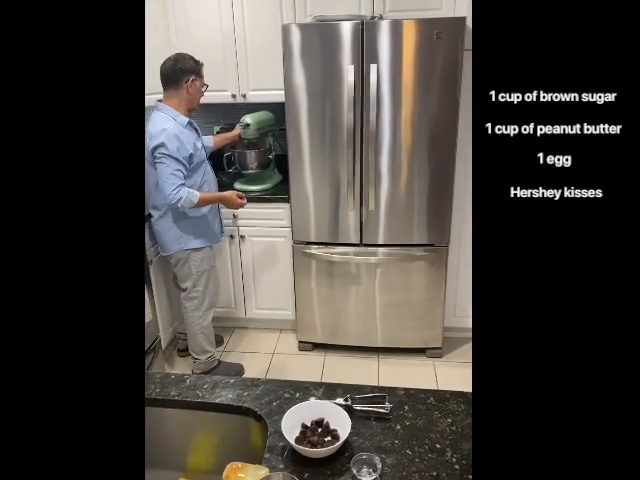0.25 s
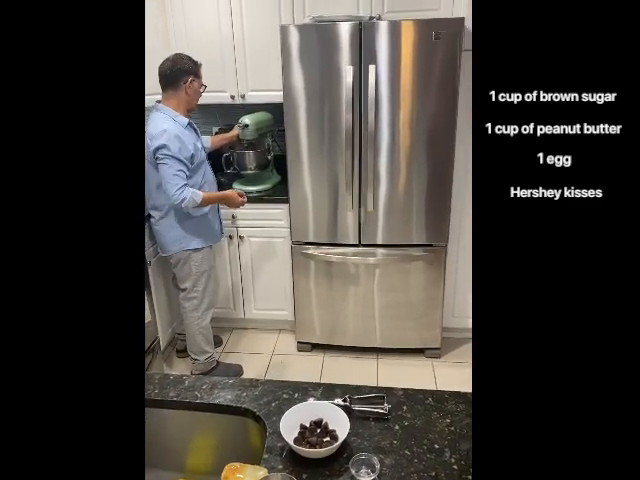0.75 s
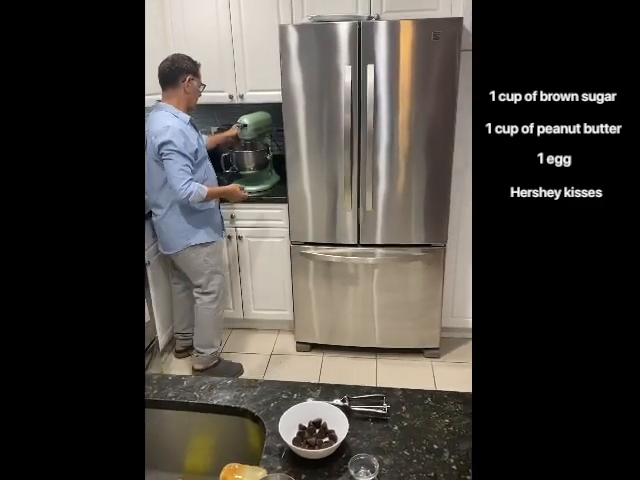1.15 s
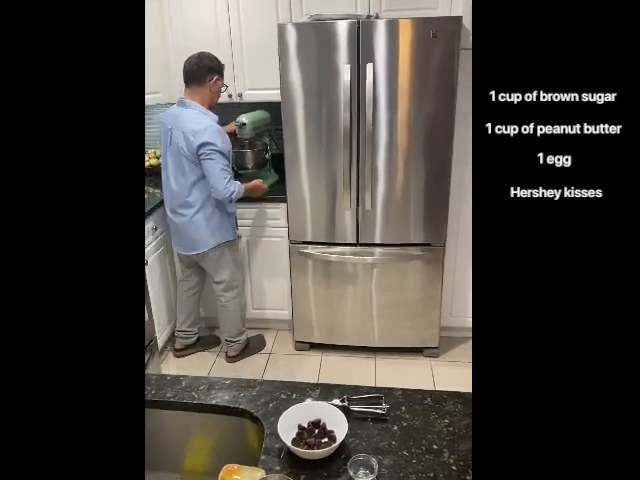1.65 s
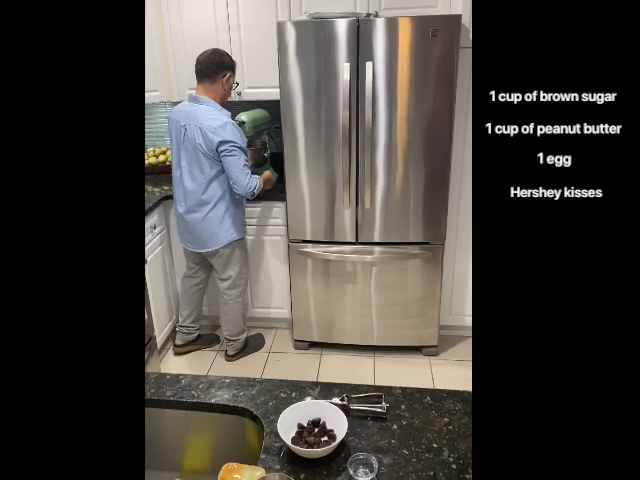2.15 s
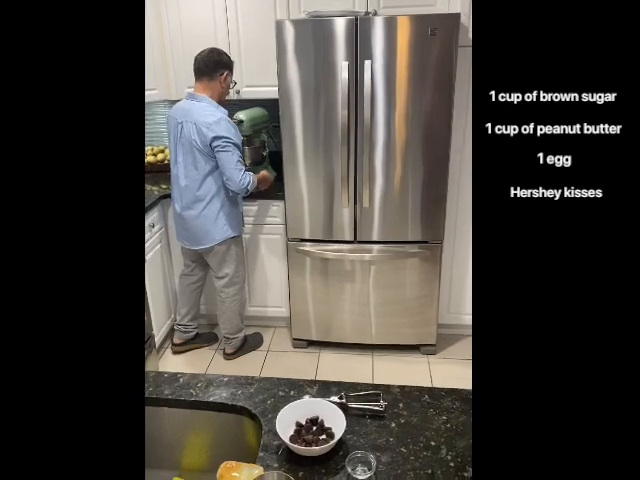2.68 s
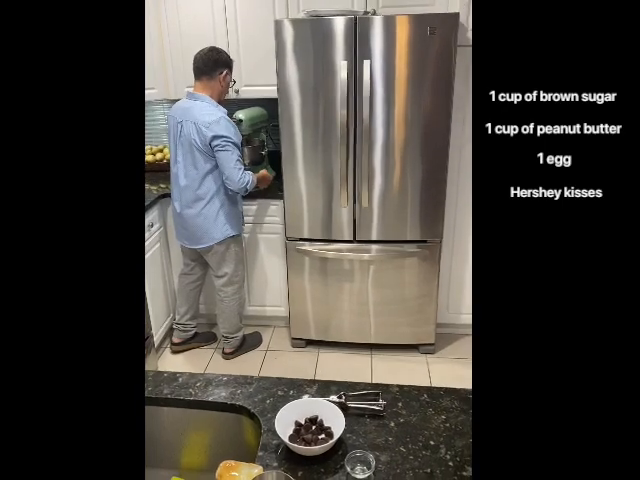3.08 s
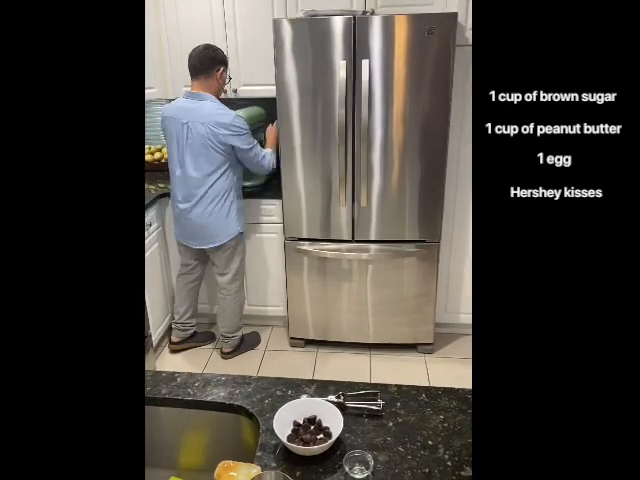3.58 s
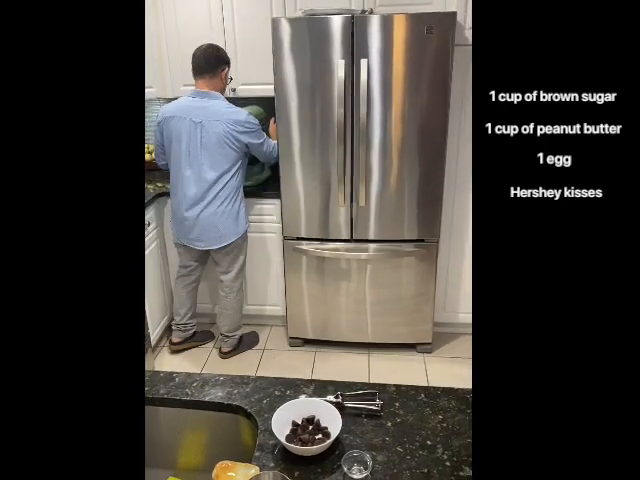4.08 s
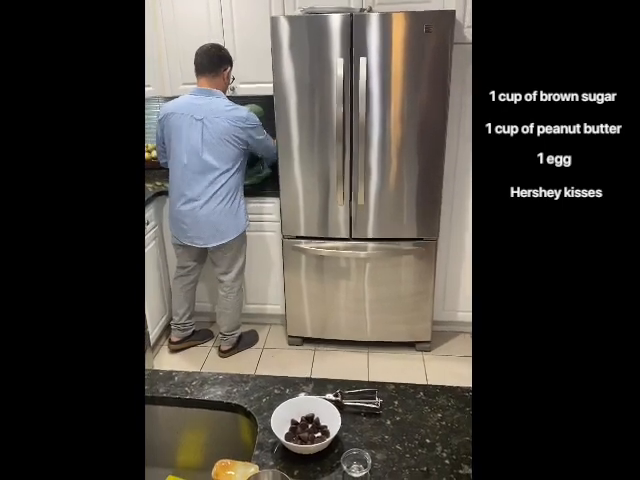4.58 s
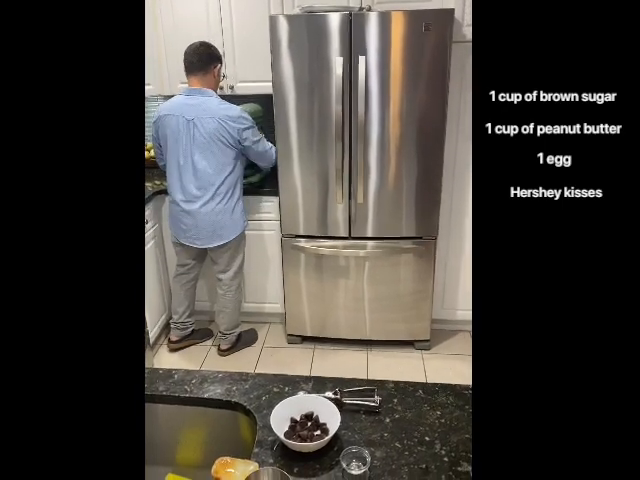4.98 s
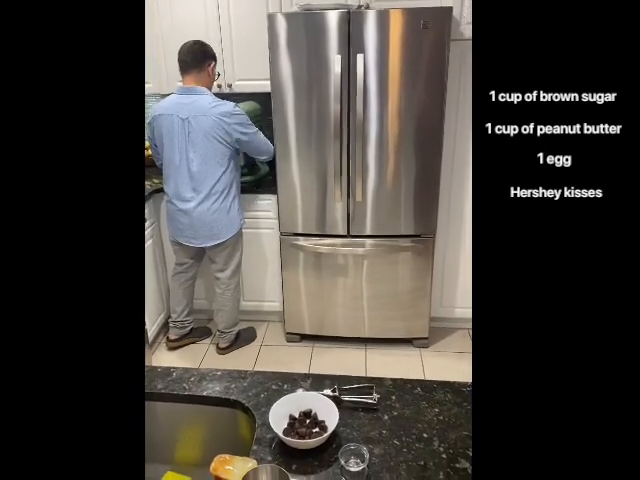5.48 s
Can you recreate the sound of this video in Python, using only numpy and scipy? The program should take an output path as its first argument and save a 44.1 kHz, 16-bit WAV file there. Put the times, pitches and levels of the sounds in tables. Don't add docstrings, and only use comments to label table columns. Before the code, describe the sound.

High lurching gear whine of a kitchen mixer, a sharp switch snap, falling spin-down hum, then steel bowl knocks and short drags.

```python
import sys
import numpy as np
from scipy import signal
from scipy.fft import rfft, irfft, next_fast_len
from scipy.io import wavfile
from scipy.ndimage import map_coordinates

SR = 44100
rng = np.random.default_rng(int(sys.argv[2]) if len(sys.argv) > 2 else 0)


def waveform_to_disk(signal):
    frames = np.transpose(np.atleast_2d(signal))
    scaled = np.clip(frames, -1, 1) * 32767
    samples = np.round(scaled).astype(np.int16)
    wavfile.write(sys.argv[1], SR, samples)


def rack_gain(trim_db):
    fader = np.asarray(trim_db, float)
    return 10 ** (fader / 20)


N = 252693
TIME = np.arange(N) / SR
HALF = np.array([[.5], [-.5]])

TEETH, FULL_HZ = 20, 2376
START_SAG_HZ, SETTLE_S = 12, .7
OFF_S, STALL_S = 3.222, 4.055


def unit(x):
    return x / np.sqrt(np.mean(x ** 2) + 1e-20)


def along(points, hz):
    f, v = np.transpose(points)
    return np.interp(np.log(hz + 1), np.log(f + 1), v)


def curves(rows):
    s, *cols = np.transpose(rows)
    return [np.interp(TIME, s, c) for c in cols]


def wobble(rate):
    knots = rng.standard_normal(int(N * rate / SR) + 4)
    return map_coordinates(knots, [TIME * rate])


def filtered(x, response):
    m = next_fast_len(N + SR // 2)
    return irfft(rfft(x, m) * response(np.fft.rfftfreq(m, 1 / SR)), m)[..., :N]


def noise(gain):
    return unit(filtered(rng.standard_normal((2, N)), gain))


def coloured(points):
    return noise(lambda hz: rack_gain(along(points, hz)))


def resonance(modes, hz):
    peaks = sum(rack_gain(2 * db) / (1 + (2 * (hz - c) / w) ** 2) for c, w, db in modes)
    return np.sqrt(1 + peaks)


def speed_db():
    coast_s, friction_hz = .85, 1000
    coasting = np.exp(-np.clip(TIME - OFF_S, 0, None) / coast_s)
    left = (FULL_HZ + friction_hz) * coasting - friction_hz
    return 20 * np.log10(np.clip(left / FULL_HZ, 1e-3, 1))


def stall_db():
    drop_db, fade_db_per_s = 7.5, 94
    late = np.clip(TIME - STALL_S, 0, None)
    return -drop_db * np.clip(late / 0.03, 0, 1) - fade_db_per_s * late


# t/s, level/dB, left-right/dB
WHINE_PATH = [(0.0, -36.5, 7), (0.03, -27, -0.5), (1.47, -27, 2), (1.68, -34, -2), (1.74, -32, 1),
              (2.12, -32, -2), (2.16, -42.5, 20), (2.19, -37, -2), (2.26, -30.5, -4), (2.41, -39.5, -5.5),
              (2.48, -41.5, -15), (2.54, -28, 0), (2.69, -37, -10.5), (2.84, -28.5, 2), (2.92, -43.5, -10),
              (3.04, -30, 0.5), (3.17, -39, -8), (3.22, -35.5, -6.5)]
# t/s, level/dB, speed change/%
DOUGH_LURCHES = [(.004, -2, -1.4), (.06, 1, 0.18), (.098, 2.5, -1.1), (0.118, -12, -0.37),
                 (.165, 3.5, 0.0013), (.191, -4, -0.27), (.224, -3, .1), (.262, 2.5, -0.27),
                 (.305, -1.5, 0.24), (.331, -1.5, 0.023), (.356, 2.5, 0.042), (.387, -4, 0.13),
                 (.412, 3, -0.16), (.437, -0.5, 0), (0.484, -8, 0.17), (.502, 2.5, 0.26),
                 (0.529, -12.5, 1.32), (.57, -4.5, -0.01), (.605, 3.5, -0.035), (0.649, -7, -1.47),
                 (.675, 3.5, 0.04), (0.693, -8.5, 1.02), (.725, -3.5, 0.2), (.78, 2.5, -0.11),
                 (.85, -1.5, 0.12), (.9, -4, -0.45), (.958, 3.5, 0.057), (1.0, -4, 0.0051),
                 (1.029, -7, 1.39), (1.125, 4, -0.021), (1.145, -5, 0.067), (1.24, -3, -0.041),
                 (1.28, 4, 0.1), (1.32, 3, -0.044), (1.47, 1.5, 0), (1.495, -3, .1), (1.545, -2, -0.14),
                 (1.599, -9.5, -0.61), (1.66, -16, 0.051), (1.72, 3, -0.021), (1.745, -4, 0.024),
                 (1.78, 4, 0.03), (1.8, -7.5, -0.036), (1.85, -14, -0.013), (1.92, -14, 0.47),
                 (2.061, -11, 0.64), (2.101, -10, -0.63), (2.18, -2, 0.14), (2.3, 0, 0.018),
                 (2.326, 6, 0.11), (2.359, -7, -0.14), (2.589, -3, -0.11), (2.64, 4.5, 0),
                 (2.74, 0.5, 0.048), (2.79, 1, 0.05), (2.87, -1, -0.062), (2.98, 3.5, 0.046),
                 (3.0, -5.5, 0.038), (3.09, -3, 0.39)]
# f/Hz, width/Hz, level/dB
GLIDE_CROSSINGS = [(2180, 170, 5), (1420, 90, 9), (1150, 100, 7)]


def mesh():
    lurch_s = 0.0083
    db, pan_db = curves(WHINE_PATH)
    s, dip_db, percent = np.transpose(DOUGH_LURCHES)[:, :, None]
    near = np.exp(-.5 * ((TIME - s) / lurch_s) ** 2)
    on = np.clip((OFF_S - TIME) / .03 + 1, 0, 1)
    speed = rack_gain(speed_db()) + np.sum(near * percent, axis=0) / 100
    hz = FULL_HZ * speed - START_SAG_HZ * np.exp(-TIME / SETTLE_S)
    rocking = 4 * wobble(30) * on
    step_in_s, step_s = 2.24, 0.33
    lead = np.interp(TIME, [step_in_s, step_in_s + step_s], [1.89, 1.1])
    crossing = sum(lift_db / (1 + ((hz - c) / w) ** 4) for c, w, lift_db in GLIDE_CROSSINGS)
    glide_db = -52 + speed_db() + crossing
    powered_db = db + np.sum(near * dip_db, axis=0)
    return hz + rocking, on * powered_db + (1 - on) * glide_db, on * pan_db, lead


# t/s, level/dB
MESH_OVERTONE = [(0, -50), (.35, -39), (1.2, -48), (1.8, -45), (1.95, -35.5), (2.2, -40), (2.5, -35),
                 (2.72, -41.5), (2.8, -37), (3.2, -43)]
# multiple of tooth pitch, level/dB
GLIDE_PARTIALS = [(1.5, -52), (2, -50)]
# shaft order, level/dB
SHAFT_ORDERS = [(2.575, -54), (3.03, -56), (3.54, -61.5), (4, -58.5), (9, -53), (10.16, -51), (10.37, -51),
                (12, -50.5), (13, -57.5), (18, -68.5), (24, -74), (25.16, -49), (27.7, -72), (29, -53),
                (36, -50.5), (42, -46), (46, -49), (47, -56), (48.1, -50), (50.1, -43.5), (51.1, -46.5),
                (56, -52.5), (60, -49)]


def gear():
    hz, db, pan_db, lead = mesh()
    off = np.clip(TIME - OFF_S, 0, None)
    loose = np.clip(off / .05, 0, 1)
    turns = 2 * np.pi * np.cumsum(hz + 3 * wobble(25.1)) / SR
    steady_hz = FULL_HZ - START_SAG_HZ * np.exp(-TIME / SETTLE_S) + 3 * wobble(4)
    steady = 2 * np.pi * np.cumsum(steady_hz) / SR
    wheel_hz, high_point_s, runout_db = 19.8, 2.038, 2
    runout = runout_db * np.cos(2 * np.pi * wheel_hz * (TIME - high_point_s) + .5 * wobble(3))

    chatter = 1.6 * loose * wobble(80)
    flutter_db = (.7 + 2.5 * loose) * wobble(45) + loose * runout
    flutter_db = flutter_db + np.array([wobble(22), wobble(22)])
    tone = rack_gain(db + 6.5 + HALF * pan_db + flutter_db) * np.sin(turns + chatter + HALF * lead)
    wall_level = rack_gain(-37 - 80 * off + 3 * wobble(25)) * (off > 0)
    lingering = wall_level * np.sin(2 * np.pi * 2372 * TIME + HALF * 1.2)

    def slip(k):
        return np.array([[0], [k]]) + (.4 + .018 * k) * wobble(20 + 1.5 * k)

    def beads():
        return 2.5 * wobble(22) + wobble(3)

    orders = 0
    for k, level in SHAFT_ORDERS:
        order_db = level + 3.0 + runout * np.clip(k / 40, .6, 1) + beads()
        orders = orders + rack_gain(order_db) * np.sin(k * steady / TEETH + slip(k))
    overtone_db = curves(MESH_OVERTONE)[0] + 1.6 * runout + 3.5 * wobble(12)
    orders = orders + rack_gain(overtone_db) * np.sin(2.005 * steady + [[0], [1]] + .7 * wobble(40))
    rattling = loose * sum(rack_gain(level + speed_db() + beads()) * np.sin(k * (turns + chatter))
                           for k, level in GLIDE_PARTIALS)
    return tone + lingering + rattling, orders * rack_gain(-250 * off)


# f/Hz, level/dB per Hz
BRUSH_HISS = [(1200, -63), (2000, -20.5), (2700, -12), (3700, -18), (4700, -10.5), (5900, -15.5),
              (8000, -19), (10000, -19), (12500, -23), (15200, -25.5), (17000, -28.5)]
# f/Hz, level/dB per Hz
BEARING_GROWL = [(90, -77), (150, -20), (200, -20), (300, -15.5), (650, -23.5), (1200, -12.5),
                 (1700, -17.5), (2300, -17.5), (3500, -49)]
# f/Hz, width/Hz, level/dB over the noise
HOUSING_MODES = [(411.7, 13, 10), (436, 13, 9), (658.4, 29, 20), (851, 30.6, 14), (1197, 70, 4.5),
                 (3290, 28, 5), (5460, 190, -2), (5960, 43, 4.5)]


def motor():
    still = 0.096
    air = np.clip(rack_gain(speed_db()) - still, .04, 1) / (1 - still)
    hiss_db = -35.5 + 0.86 * 20 * np.log10(air) + stall_db()
    growl_db = -40.5 + 0.72 * speed_db() + stall_db()

    def housed(colour):
        return noise(lambda hz: rack_gain(along(colour, hz)) * resonance(HOUSING_MODES, hz))

    load = wobble(5.9)
    hiss = rack_gain(hiss_db + 4.5 + .5 * load + 0.93 * wobble(29.48)) * housed(BRUSH_HISS)
    growl = rack_gain(growl_db + 0.5 + 0.24 * load + 0.25 * wobble(26)) * housed(BEARING_GROWL)
    dulled = rack_gain(0.12 * speed_db()) - 1
    upper = filtered(growl, lambda hz: 1 / (1 + (1000 / (hz + 1)) ** 4))
    return hiss + growl + dulled * upper


# f/Hz, width/Hz, level/dB, rubbed level/dB under it
SINGING_MODES = [(393, 26, -49, -12), (650, 47, -36.5, -15), (850, 51, -42, -32), (1450, 190, -47, -24)]
# shaft order, level/dB
SWEEPING_ORDERS = [(5.3, 0), (9.5, 2), (11, 3.5), (20, 2), (30, -8)]


def humming():
    shaft_hz = FULL_HZ * rack_gain(speed_db()) / TEETH
    free = np.clip((TIME - OFF_S) / 0.23, 0, 1) * rack_gain(2 * stall_db())
    hum = 0
    for c, w, db, rub_db in SINGING_MODES:
        swept = sum(rack_gain(level) / (1 + (2 * (k * shaft_hz - c) / w) ** 2) for k, level in SWEEPING_ORDERS)
        phase = 2 * np.pi * c * TIME + np.array([wobble(30), wobble(30)])
        sing = rack_gain(1.3 * wobble(28)) * np.sin(phase)
        hum = hum + rack_gain(db + 2.0) * (swept + rack_gain(rub_db)) * sing
    return free * hum


# f/Hz, t60/s
KITCHEN_T60 = [(150, 0.27), (1000, 0.42), (4000, 0.28), (10000, 0.27), (16000, 0.18)]


def kitchen(x):
    hz, t, z = signal.stft(rng.standard_normal((2, SR * 2 // 3)), SR, nperseg=256)
    decay = rack_gain(-60 * t / along(KITCHEN_T60, hz)[:, None])
    tail = signal.istft(z * decay, SR, nperseg=256)[1]
    late = np.pad(x, (150, 0))[None]
    return signal.fftconvolve(late, tail / np.linalg.norm(tail[0]), axes=1)[:, :N]


# t/s, level/dB, decay/s
LEVER_SNAPS = [
    (3.2089, -15, 0.0039),
    (3.2115, -21.5, 0.0091),
    (3.2147, -27, 0.0053),
    (3.223, -25.5, 0.0043),
    (3.248, -27, 0.0067),
]
# f/Hz, level/dB per Hz
SNAP_COLOUR = [(1200, -43.5), (2500, -5.5), (3300, 5.5), (3900, 3.5), (4600, 7.5), (5500, -5), (7500, -23),
               (10000, -4), (13000, -13)]


def switch():
    s, db, decay = np.transpose(LEVER_SNAPS)[:, :, None]
    late = np.clip(TIME - s, 0, None)
    bursts = np.sum(rack_gain(db) * (late > 0) * np.exp(-late / decay), axis=0)
    snap = bursts * rack_gain(1.5 * wobble(1300)) * coloured(SNAP_COLOUR)[0]
    return snap * [[1], [.6]] + rack_gain(-11) * kitchen(snap)


# f/Hz, level/dB, t60/s
BOWL_MODES = [(287, -7, 0.08), (435.7, 1, 0.12), (459, -1, 0.1), (520, -3.5, 0.058), (652.6, 0, 0.08),
              (850, 5, 0.06), (1003, 0, .12), (1070, 0, 0.14), (1122, 20, 0.028), (1176, -2, .1),
              (1240, -1, 0.056), (1500, 15, 0.057), (1890, -35, 0.06), (2000, -7, 0.051),
              (2320, 1.5, 0.065), (2480, 8, 0.047)]
# f/Hz, level/dB, t60/s
STAND_MODES = [(2996, 7, 0.055), (2980, 6.5, 0.089), (3450, 16.5, 0.037), (3920, 6.5, 0.074),
               (2590, 15, 0.051), (4190, 5, 0.15), (4740, -2, 0.088), (5220, 6, 0.06), (5830, 8, .05),
               (6050, 13, .07), (6600, 10, 0.06), (7330, 0, .05), (7840, 7, .1)]
# f/Hz, level/dB per Hz
CRACK_COLOUR = [(70, -50), (150, -42), (300, -27), (680, -13), (1100, -13.5), (1500, -21), (2600, -11.5),
                (3200, -16.5), (4300, -11), (9000, -25.5), (16000, -27)]


def contacts(events):
    out, t = np.zeros(N + SR), np.arange(SR // 4) / SR
    hz, level, t60 = np.transpose(list(BOWL_MODES) + list(STAND_MODES))[:, :, None]
    held = np.clip(t60, .03, .13)
    modes = rack_gain(level - 60 * t / held) * np.sin(2 * np.pi * hz * t)
    crack = coloured(CRACK_COLOUR)[0]
    for s, db, rattle_s, crack_db, most_hz, spread_oct in events:
        start = round(s * SR)
        shape = np.exp(-t / np.clip(rattle_s, .002, .016)) * (1 - np.exp(-t / .0015))
        excited = (1 + (np.log2(hz / most_hz) / spread_oct) ** 2) ** 1.8
        body = np.sum(modes / excited, axis=0)
        ring = signal.fftconvolve(shape ** 2 * rng.standard_normal(len(t)), body)[:len(t)]
        cracking = .5 * rack_gain(crack_db) * shape * np.resize(crack[start:], len(t))
        out[start:start + len(t)] += rack_gain(db) * (ring / np.abs(ring).max() + cracking)
    return out[:N]


# t/s, level/dB, most excited f/Hz, crack level/dB
POINT_KNOCKS = [(4.364, -20.5, 2350, -0.5), (4.366, -40, 6050, 2), (4.404, -26, 6050, -4),
                (4.408, -33, 7840, -2), (4.41, -24, 3050, -2), (4.411, -18, 2600, 3),
                (4.385, -39, 7840, -1), (4.407, -24, 4140, 1.5), (4.405, -24, 3400, 3),
                (4.44, -42, 4050, -6), (4.62, -27, 6050, 0), (4.618, -19, 2590, 0), (4.631, -19, 2600, 0),
                (4.617, -23, 4200, 0), (4.622, -10.5, 1090, 2.5), (4.631, -20, 4200, -3),
                (4.655, -22, 1500, 6), (4.636, -23, 1500, 3), (4.707, -28, 850, 4), (4.64, -22.5, 2590, -8),
                (4.69, -25, 1100, -5), (4.959, -36, 2000, 13), (4.962, -41, 2480, 5), (5.189, -21, 850, 0),
                (5.198, -26, 850, -5), (5.2, -30, 1245, -5), (5.191, -36.5, 5830, 14),
                (5.196, -21, 3450, 14), (5.222, -27, 1500, -3), (5.235, -37, 850, -1),
                (5.315, -41, 850, -5), (5.35, -45, 850, -7), (5.358, -36, 2000, 3), (5.364, -41, 3450, 0),
                (5.724, -38, 2240, 10)]
# t/s, level/dB, most excited f/Hz, crack level/dB
FLAT_KNOCKS = [(4.022, -43, 1050, 11.5), (4.313, -68, 3000, -5), (4.353, -38, 1110, 13),
               (4.368, -26.5, 520, 4), (4.383, -20, 520, 2), (4.402, -34, 600, 6), (4.406, -24.5, 3580, 8),
               (4.412, -25, 3200, 8.5), (4.606, -22, 2470, -6), (4.616, -13.5, 1300, 9),
               (4.619, -19, 480, -8), (4.622, -16.5, 2510, 11.5), (4.635, -20.5, 1000, -10),
               (4.636, -19, 417, -3), (4.654, -22.5, 500, -1), (4.676, -20, 440, -12),
               (4.704, -20.5, 666, -11), (4.74, -24, 440, -5), (4.777, -34, 1120, -3),
               (4.837, -62, 2500, -7), (5.05, -51.5, 1900, 21), (5.178, -52, 1198, 2),
               (5.568, -33, 5200, 12), (5.570, -24, 520, 8), (5.587, -27, 500, -8), (5.601, -36.5, 520, 10),
               (5.621, -28, 493, 0), (5.64, -35, 480, -5), (5.655, -44, 475, -8), (5.675, -45, 550, -5)]


def bowl():
    events = []
    for rows, spread_oct in ((POINT_KNOCKS, .17), (FLAT_KNOCKS, .7)):
        for s, db, hz, crack_db in rows:
            rattle_s = 0.0067 * rack_gain(-0.4 * crack_db)
            events.append((s, db, rattle_s, crack_db, hz, spread_oct))
    events.sort()
    knocks = [contacts(events[k::3]) for k in range(3)]
    return sum(rack_gain(-0.5) * knock * [[1], [.1]] + rack_gain(-4) * kitchen(knock) for knock in knocks)


# peak t/s, level/dB, rise/s and fall/s of the slopes
FOOT_SHOVES = [
    (4.318, -52.5, 0.034, 0),
    (4.374, -38, 0.071, 1.17),
    (4.55, -43, 0.081, 0.56),
    (4.66, -36.5, 0.077, 0.62),
    (5.0, -54, 0.092, 0.43),
    (5.187, -35, 0.022, 0.29),
    (5.4, -49, 0.63, 0.84),
    (5.72, -54.5, 0.4, 3.5),
]
# f/Hz, level/dB per Hz
RUB_COLOUR = [(180, -42.5), (300, -32), (460, -3.5), (630, -8.5), (1030, -4), (1700, -10.5), (4200, -13.5),
              (10000, -34), (16000, -52)]
# f/Hz, width/Hz, level/dB
SCRAPED_MODES = [(850, 73, 7), (1080, 120, 0), (2650, 170, -8), (4200, 200, 7.5), (6050, 150, 4),
                 (7740, 150, 4)]
# t/s, f/Hz, level/dB
FOOT_SQUEAK = [(4.55, 3618, -79), (4.56, 3618, -54), (4.576, 3620, -41), (4.604, 3618, -41),
               (4.615, 3620, -82)]
# t/s, f/Hz, level/dB
FOOT_CREAK = [(5.375, 7350, -91), (5.39, 7200, -69), (5.41, 7350, -68), (5.425, 7330, -74.5),
              (5.44, 7400, -66), (5.465, 7320, -64), (5.48, 7200, -92)]


def drag():
    shoves = sum(rack_gain(db - 64.0 * np.maximum((s - TIME) / rise, (TIME - s) / fall))
                 for s, db, rise, fall in FOOT_SHOVES)
    rub = noise(lambda hz: rack_gain(along(RUB_COLOUR, hz)) * resonance(SCRAPED_MODES, hz))
    scrape = shoves * (TIME > STALL_S) * rack_gain(2.8 * wobble(60)) * rub
    for rows in (FOOT_SQUEAK, FOOT_CREAK):
        hz, db = curves(rows)
        scrape = scrape + rack_gain(db + wobble(60)) * (db > -79) * np.sin(2 * np.pi * np.cumsum(hz) / SR)
    return scrape


# t/s, peak level/dB, f/Hz
WORKTOP_THUDS = [(2.868, -41, 72.4), (4.034, -35, 49.7), (4.086, -30.5, 51.5), (4.395, -47, 79),
                 (4.618, -35, 74.5), (4.819, -39, 54), (5.04, -42.5, 55.3), (5.2, -45, 77),
                 (5.48, -45.5, 61.4), (5.599, -44.5, 70), (5.679, -49, 66.6)]
# f/Hz, level/dB per Hz
RUMBLE_COLOUR = [(15, -65.5), (32, -47), (57, -6.5), (90, -14.5), (125, -14.5), (160, -24.5), (200, -22.5),
                 (440, -21), (700, -30.5), (1500, -44.5), (4000, -90)]


def worktop():
    s, db, hz = np.transpose(WORKTOP_THUDS)[:, :, None]
    late = np.clip(TIME - s, 0, None)
    swell = rack_gain(db + 3.0 - 60 * late / 0.31) * (1 - np.exp(-late / 0.0083))
    thuds = np.sum(swell * np.sin(2 * np.pi * hz * late), axis=0)
    shaken_db = 4 * rack_gain(speed_db())
    rumble = rack_gain(-54.5 + shaken_db + 1.0 + 1.7 * wobble(5.9)) * coloured(RUMBLE_COLOUR)
    return thuds * [[1], [0]] + rumble


# f/Hz, correlation
PORT_LIKENESS = [(300, .97), (800, .62), (1300, .7), (1800, .95), (2300, .75), (3000, .25), (3800, .1),
                 (5000, .6), (6000, .8), (7800, .6), (11000, .72), (16000, .8)]
# f/Hz, phase/rad
PORT_LEAD = [(300, -.3), (750, -1), (1200, -.1), (2000, .2), (2300, 1.6), (4300, 3.1), (5000, 3.4),
             (5500, 6.7), (10000, 8.5), (11000, 9.3), (16000, 9.5)]
# f/Hz, left-right/dB
PORT_TILT = [(60, 6), (110, 3.5), (190, 5.5), (340, 5.5), (610, 5), (1080, 2), (1930, -1.5), (3440, -2),
             (6120, -1.5), (10900, 4)]


def ports(pair):
    def short(hz):
        return hz ** 2 / (hz ** 2 + 200 ** 2)

    def split(hz):
        angle = short(hz) * np.arccos(np.clip(along(PORT_LIKENESS, hz), 0, 1)) / 2
        return np.array([np.cos(angle), np.sin(angle)])

    def differ(hz):
        half = HALF * short(hz)
        return rack_gain(half * along(PORT_TILT, hz)) * np.exp(1j * half * along(PORT_LEAD, hz))

    shared, apart = filtered(pair, split)
    return filtered([shared + apart, shared - apart], differ)


def scene():
    tone, orders = gear()
    return tone + ports(orders + motor() + humming() + switch() + bowl() + drag() + worktop())


def thinned(x, bands):
    hz, t, z = signal.stft(x, SR, nperseg=1024, noverlap=512, window="cosine")
    level = np.log(np.sum(np.abs(z[hz > 8000]) ** 2, axis=0) + 1e-12)
    usual = np.median(level)
    blow = (np.diff(level, prepend=level[0]) > 2) & (level > usual)
    keep = np.ones(z.shape)
    for low_hz, high_hz, share in bands:
        luck = np.repeat(rng.uniform(size=len(t)), 3)[:len(t)]
        below = keep[np.argmax(hz >= low_hz) - 1]
        hard = blow * (level > usual + 1.1 * (low_hz > 11500))
        keep[(hz >= low_hz) & (hz < high_hz)] = (luck < share) * below + hard > 0
    return signal.istft(z * keep, SR, nperseg=1024, noverlap=512, window="cosine")[1][:N]


def top_cut(x):
    return signal.sosfilt(signal.butter(12, 15800, fs=SR, output="sos"), x)


# from f/Hz, to f/Hz, share of blocks kept
MID_BANDS = [(2600, 2760, .97), (4330, 4500, .93), (4560, 4680, .94), (4830, 4930, .93), (5080, 5200, .96),
             (7750, 7950, .96), (9200, 9450, .93), (9600, 10300, .93), (10300, 10700, .65),
             (10700, 11050, .8), (11050, 11700, .08), (11700, 16000, 0)]
DIFFERENCE_BANDS = [(1450, 1700, .65), (1700, 1950, .5), (6250, 6450, .85), (15200, 15500, .85),
                    (15500, 15800, .7), (15800, 22050, 0)]


def record(dry):
    mid = thinned((dry[0] + dry[1]) / 2, MID_BANDS)
    side = thinned((dry[0] - dry[1]) / 2, DIFFERENCE_BANDS)
    mid = filtered(mid, lambda hz: hz < 15700)
    return top_cut(np.array([mid + side, mid - side]))


dry = scene()
out = record(dry)
waveform_to_disk(out)
```